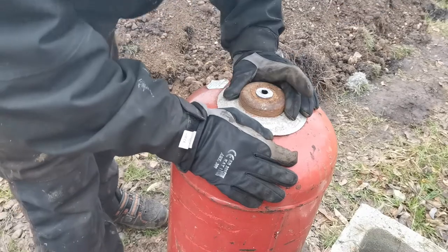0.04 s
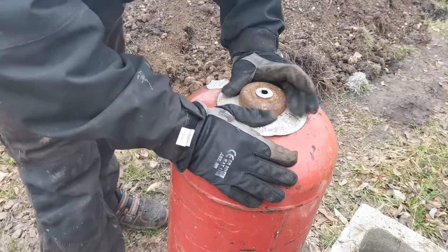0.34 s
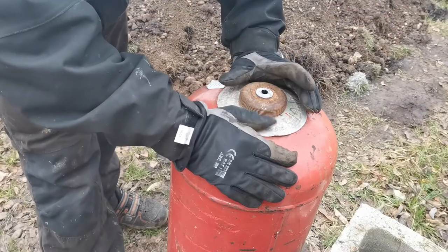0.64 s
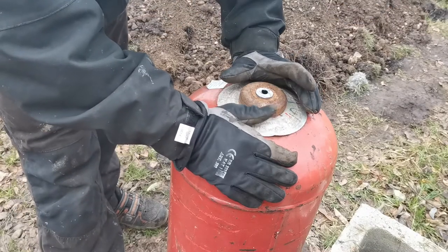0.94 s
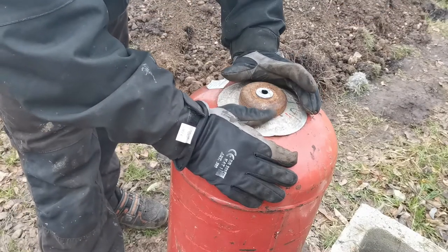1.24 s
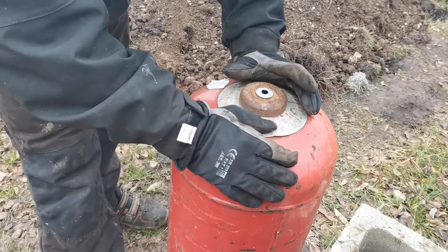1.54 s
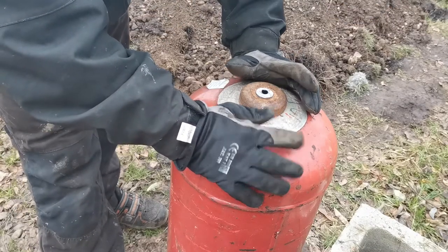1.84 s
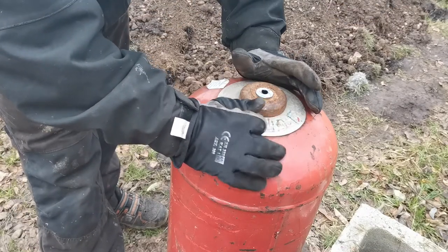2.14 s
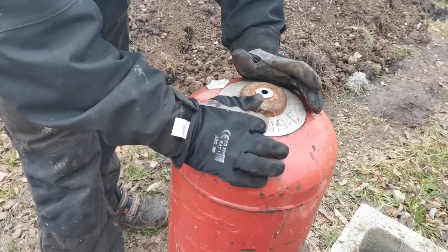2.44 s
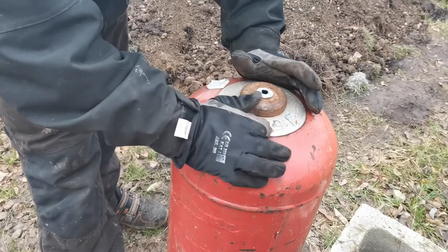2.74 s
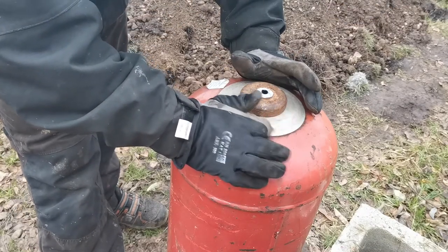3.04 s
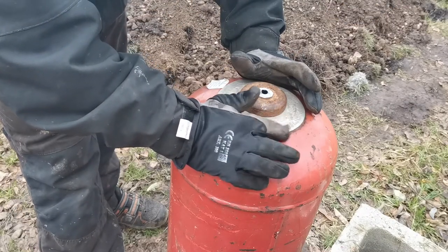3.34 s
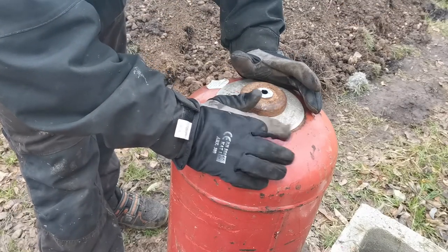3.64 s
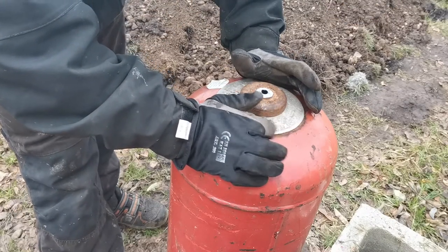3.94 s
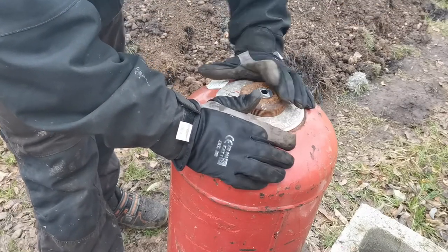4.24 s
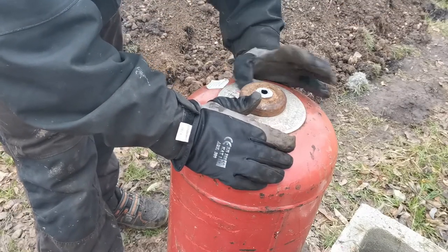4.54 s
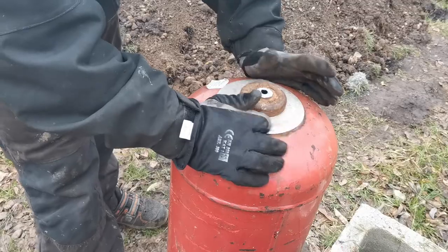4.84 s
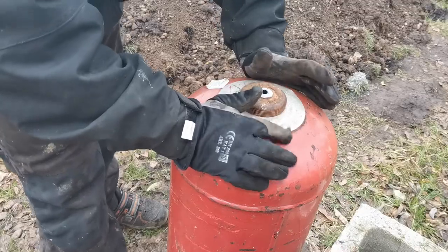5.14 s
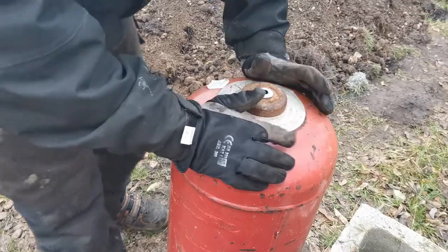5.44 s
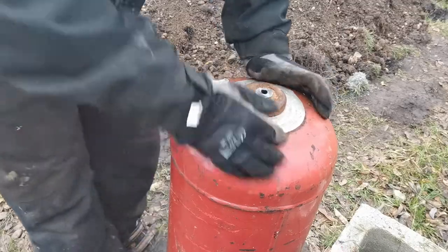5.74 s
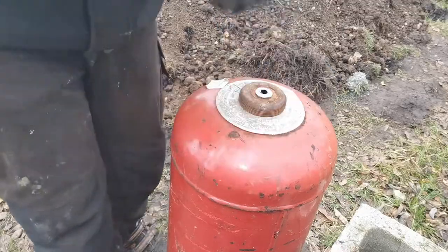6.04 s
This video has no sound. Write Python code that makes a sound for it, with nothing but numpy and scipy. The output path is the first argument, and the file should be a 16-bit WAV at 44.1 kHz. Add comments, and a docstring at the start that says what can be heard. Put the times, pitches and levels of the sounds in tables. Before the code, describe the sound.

Close by, a loose rusty collar is rocked on a steel gas cylinder in quick, gritty clicks that grow louder. Longer scrapes follow, with small squeaks and a faint metal ring. Gloves rub, the collar snaps free sharply and scrapes again, then clothes rustle as someone steps back. A soft, distant outdoor rush lies underneath.

```python
"""Stick-slip friction on a rusty gas cylinder

Outdoors, gloved hands rock a loose metal collar around the valve of a steel cylinder, then drag it round
in longer scrapes. Rust grates in tiny slips that excite the hand-damped collar and, faintly, the shell;
now and then the collar catches and snaps free. At the end the worker steps back with
rustling clothes. Behind it all lies a soft distant rush in which something moans once."""
import sys
import numpy as np
from scipy import signal
from scipy.fft import rfft, irfft, next_fast_len
from scipy.io import wavfile
from scipy.ndimage import map_coordinates

SR = 44100
rng = np.random.default_rng(int(sys.argv[2]) if len(sys.argv) > 2 else 0)


def pcm_store(signal):
    """Save signal as 16-bit PCM."""
    levels = np.round(np.clip(np.atleast_2d(signal), -1, 1) * 32767)
    wavfile.write(sys.argv[1], SR, levels.astype(np.int16).T)


N = 277642

# spectrum of the distant rush: (frequency [Hz], gain [dB])
AIR_SPECTRUM = [(13, -35), (22, -5.5), (49, -2), (192, -11.5), (227, -3.5), (342, -8), (371, -8.5),
                (650, -5), (860, 0), (1240, -6), (1680, -12), (2150, -19.5), (4040, -31), (6440, -43),
                (9200, -49), (15500, -46.5)]
# left-right likeness of the rush: (frequency [Hz], coherence [ratio])
AIR_COHERENCE = [(30, 0.56), (100, 0.81), (400, 0.83), (900, 0.22), (2500, 0.043), (9000, 0.38)]
# thin tones above the moan: (starting frequency [Hz], level relative to the moan [dB])
MOAN_PARTIALS = [(2190, -17), (3720, -29)]
# steps and flaps of clothing: (time [s], relative level [dB], frequency [Hz], bandwidth [Hz], t60 [s])
BUMPS = [(5.642, -36.5, 376, 480, 0.11), (5.655, -46, 1800, 2000, .06), (5.875, -36.5, 447, 600, 0.035),
         (6.042, -36.5, 1100, 1650, 0.077), (6.116, -30.5, 313, 259, 0.051)]
# sleeves and trousers rubbing: (peak time [s], half length [s], level [dB])
BODY_MOVES = [(.35, 0.23, -62), (4.68, 0.29, -60.5), (5.412, 0.23, -55.5), (5.963, 0.28, -50.5)]
# spectrum of rustling cloth: (frequency [Hz], gain [dB])
FABRIC_SPECTRUM = [(500, 6), (1500, -1.5), (3000, 0), (4500, 2), (5800, -3), (7200, -2.5), (10000, -5),
                   (13000, -12.5), (16000, -34)]
# gloves sliding over paint and rust: (start [s], rise [s], fall [s], level [dB])
GLOVE_RUBS = [(1.870, 0.062, 0.1, -45.5), (4.110, .110, 0.099, -39.5), (4.340, 0.096, 0.04, -43),
              (4.525, 0.018, 0.091, -44)]
# spectrum of glove friction: (frequency [Hz], gain [dB])
GLOVE_SPECTRUM = [(400, -14), (1300, 2), (1900, -2.5), (2700, 1.5), (4500, -2), (5700, -6), (7200, -5.5),
                  (10000, -11.5), (13000, -22.5), (16000, -36)]
# echo spectrum, short wavelengths scattering most: (frequency [Hz], gain [dB])
ECHO_SPECTRUM = [(1000, -6.5), (2400, -6.5), (4500, -4), (9000, -2.5)]
# decay of the shell's dense weak modes: (frequency [Hz], t60 [s])
HAZE_DECAY = [(500, .08), (1300, 0.23), (2400, 0.23), (3000, 0.21), (4600, 0.41), (5600, 0.26),
              (9000, 0.17), (15000, .06)]
# the collar is turned back and swells into its stop: (stop time [s], relative level [dB])
RETURN_TURNS = [(.506, -35.5), (.697, -41), (.878, -30.5), (1.054, -29), (1.229, -21.5), (1.387, -25),
                (1.574, -18.5)]
# the collar is pushed on, breaks free and grates to rest:
# (time [s], relative level [dB], fall [s], low emphasis [dB], sharpness [dB])
BREAKAWAYS = [(.567, -28.5, 0.026, 4, -18.5), (.756, -26.5, 0.038, 7, -17), (.930, -21.5, .038, 3.5, -15),
              (1.094, -22, 0.04, 2, -17), (1.273, -20, 0.023, -2.5, -16.5), (1.440, -20.5, 0.012, 2, -19.5),
              (1.939, -31, 0.0055, 5, -22), (2.338, -33, 0.011, 13.5, -2), (2.411, -44.5, 0.026, 16, 6),
              (2.983, -40, .03, 9, -6), (4.444, -11.5, 0.0057, -7, -2), (5.247, -22.5, 0.025, 3.5, -4)]
# flakes of rust breaking off: (time [s], relative level [dB], sharpness [dB])
FLAKES = [(.58, -46, 12.5), (.770, -26, -8), (.870, -28.5, -16), (1.182, -56, 22), (1.898, -39, 0),
          (2.108, -27, 7), (2.656, -49, 8.5), (3.088, -19, 6.5), (3.1123, -17.5, 4), (3.128, -26.5, 12.5),
          (3.371, -46.5, 2), (4.447, -17, 4), (4.546, -39.5, 15.5), (4.860, -18, -9), (4.996, -41, 11),
          (5.155, -46.5, 7.5)]
# light slides that swell and stop: (peak time [s], relative level [dB], fall [s], low emphasis [dB])
LIGHT_SLIDES = [(2.449, -32, 0.0091, -7), (2.773, -30.5, 0.027, 3.5), (2.836, -48, 0.014, 8.5),
                (3.826, -31, 0.01, -13)]
# long scrapes, one curve each: (time [s], relative level [dB], treble emphasis [dB], low emphasis [dB])
LONG_SCRAPES = [
    [(1.95, -45.5, -4, -12), (2.014, -42.5, -3.5, -3), (2.058, -32, -6, 3.5), (2.066, -37.5, -3, -0.5),
     (2.088, -19, -6, 0), (2.11, -24.5, -6.5, -10.5), (2.122, -29.5, -20, -5), (2.15, -53, -7, -1)],
    [(3.03, -45, -11, -3), (3.056, -48, -4.5, -2), (3.076, -26.5, -3, -6.5), (3.128, -28, -14, -20),
     (3.146, -33, -4.5, -23), (3.206, -31.5, -7, -14.5), (3.262, -36, -12.5, -13), (3.29, -58, -14, -12)],
    [(3.41, -62, -4, 3), (3.426, -23.5, -12, -6.5), (3.46, -21, -8.5, -10.5), (3.505, -41.5, -29, -2)],
    [(4.848, -42, -13, -16), (4.862, -18, -13.5, -14), (4.874, -23.5, -8.5, -6), (4.902, -23.5, -6, -9.5),
     (4.954, -29.5, -10.5, -4), (4.992, -36, -9, -14), (5.04, -56, -9, -3)],
]
# brief tones of the collar (squeaks in the scrapes, a scrape's low note, the loudest snap's short ring):
# (peak time [s], rise and fall each [s], frequency [Hz], level [dB])
COLLAR_TONES = [(2.089, .012, 926, -25.5), (2.091, .018, 1130, -24.5), (2.108, 0.018, 2370, -26.5),
                (3.082, .02, 1500, -33), (3.113, .04, 2234, -28), (3.175, 0.062, 1776, -37),
                (3.198, .045, 1305, -35), (3.45, .025, 1470, -32.5), (4.446, .004, 1450, -27),
                (4.446, 0.0037, 2500, -21), (4.446, .004, 5750, -21), (4.948, 0.026, 1600, -34),
                (4.952, 0.052, 2080, -31.5), (4.962, 0.036, 2630, -38)]
# force spectrum of a slip on rust: (frequency [Hz], gain [dB])
SLIP_SPECTRUM = [(60, -13), (300, -22), (700, 8.5), (1200, -1.5), (10500, -0.5), (13000, 4), (16000, -36)]
# modes of the collar damped by the gloves: (frequency [Hz], bandwidth [Hz], relative gain [dB])
DAMPED_COLLAR_MODES = [(1139, 337, -8.5), (1423, 232, -1.5), (2253, 219, 1.5), (2558, 276, 1.5),
                       (3257, 146, -10), (3914, 446, -6), (4850, 560, -8.5), (5614, 427, -10),
                       (6930, 720, -13.5), (9690, 1500, -21.5)]
# modes of the collar where the gloves lift off it: (frequency [Hz], relative energy [dB], t60 [s])
FREE_COLLAR_MODES = [(2222, -14, 0.11), (2520, -24, 0.12), (2614, -11.5, 0.05), (3280, -19, 0.12),
                     (3980, -14.5, 0.11), (5600, -26, 0.047), (7220, -25, 0.033)]
# modes of the cylinder's shell: (frequency [Hz], relative energy [dB], t60 [s])
SHELL_MODES = [(1309, -14, 0.37), (1560, -24, 0.23), (1740, -30, 0.59), (1788, -19, 0.14), (3210, -30, 0.4),
               (3610, -32, .3), (3990, -33, 0.15), (3990, -31, 0.29), (4280, -42, .33), (4440, -38, .33),
               (4750, -31, 0.33), (4800, -33.5, 0.27), (4970, -35, 0.33), (6650, -45, .2)]
# stereo level difference of the valve's sound: (frequency [Hz], left minus right [dB])
LEVEL_DIFFERENCE = [(800, 0), (1150, -2), (1500, 0), (1900, -3), (2600, -4), (3900, -2.5), (4600, -3.5),
                    (7200, -2.5), (7900, -4), (9400, 16.5), (10500, -9), (15000, 5)]
# stereo phase difference of the valve's sound: (frequency [Hz], left lead [rad])
PHASE_DIFFERENCE = [(1400, 0), (4500, 0.7), (7000, 0.77), (9500, 2.4), (11000, -2), (13000, -2.5)]


def amp(db):
    """Amplitude grows tenfold for every 20 dB."""
    return 10 ** (np.asarray(db) / 20)


def unit(x):
    """Normalisation to an rms of 1."""
    return x / np.sqrt(np.mean(x ** 2) + 1e-20)


def along(points, hz):
    """Interpolation of (frequency, value) points on a logarithmic frequency axis."""
    frequencies, values = np.transpose(points)
    return np.interp(np.log(hz + 1), np.log(frequencies), values)


def wobble(rate, size):
    """Random modulation: a smooth curve with `rate` knots a second."""
    knots = rng.standard_normal(int(size * rate / SR) + 4)
    return map_coordinates(knots, [np.arange(size) * rate / SR])


def filtered(x, response):
    """Linear filtering: the spectrum of x is multiplied by a complex frequency response."""
    size = x.shape[-1]
    padded = next_fast_len(size + 1024, real=True)
    return irfft(rfft(x, padded) * response(np.fft.rfftfreq(padded, 1 / SR)), padded)[..., :size]


def below(x, hz, order=8):
    """Zero-phase low-pass filtering keeps the part of x under a frequency."""
    return filtered(x, lambda f: 1 / (1 + (f / hz) ** order))


def resonance(f, hz, width):
    """Forced response of one damped mode, with gain 1 at its centre."""
    return 1j * f * width / (hz * hz - f * f + 1j * f * width)


def add(track, start, x):
    """Superposition: x joins the track at a start time in seconds."""
    part = track[..., max(round(start * SR), 0):][..., :x.shape[-1]]
    part += x[..., :part.shape[-1]]


def swell(t, rise, fall, swell_db, sag_db, release):
    """Exponential growth and decay: an envelope that builds, sags and dies away."""
    return amp(np.interp(t, np.cumsum([0, rise, fall, release]), [-swell_db, 0, -sag_db, -80]))


def stereo_noise(spectrum, coherence):
    """Partial coherence: independent mid and side noises mix to a given left-right likeness."""
    def response(hz):
        angle = np.arccos(np.clip(along(coherence, hz), -1, 1)) / 2
        return amp(along(spectrum, hz)) * [np.cos(angle), np.sin(angle)]
    mid, side = filtered(rng.standard_normal((2, N)), response)
    return unit(np.array([mid + side, mid - side]))


def distant_rush(level_db=-47.5):
    """Ambient noise: a nearly steady rush, weighted to low frequencies."""
    return amp(level_db + 0.14 * wobble(5.09, N)) * stereo_noise(AIR_SPECTRUM, AIR_COHERENCE)


def distant_moan(start=2.23, level_db=-45, centre_hz=584, width_hz=250, sag_per_s=0.1):
    """Narrow-band noise swells and fades as a hollow, far-off moan; two thin tones sink above it."""
    track, t = np.zeros((2, N)), np.arange(SR) / SR
    noise = rng.standard_normal(len(t)) + 0.5 * rng.standard_normal((2, len(t)))
    moan = unit(filtered(noise, lambda f: resonance(f, centre_hz, width_hz) ** 2))
    for hz, db in MOAN_PARTIALS:
        pitch = hz * (1 - sag_per_s * t + 0.025 * wobble(300, len(t)))
        tone = np.sin(2 * np.pi * np.cumsum(pitch) / SR)
        moan += amp(db) * unit(tone * amp(3.2 * wobble(49, len(t))))
    envelope = swell(t, rise=0.43, fall=0.053, swell_db=6, sag_db=5, release=0.82)
    add(track, start, amp(level_db) * envelope * moan)
    return track


def worker(still_db=-69.5):
    """Cloth friction rustles with each move; boots and flaps of cloth give heavily damped impacts."""
    bumps, t = np.zeros((2, N)), np.arange(SR // 8) / SR
    attack = 1 - np.exp(-t / 0.00062)
    for start, db, hz, width, t60 in BUMPS:
        colour = lambda f: resonance(f, hz, width) ** 2 + 0.23 * resonance(f, hz, width)
        puff = unit(filtered(rng.standard_normal(len(t)), colour))
        add(bumps, start, amp(db + 0.5 - 60 * t / t60) * attack * puff)
    clock = np.arange(N) / SR
    motion = sum(amp(db) * np.exp(-((clock - peak) / half) ** 2) for peak, half, db in BODY_MOVES)
    flutter = amp(1.3 * wobble(18, N))
    rustle = stereo_noise(FABRIC_SPECTRUM, coherence=[(1000, 0.2), (8000, 0.045)])
    return bumps + (amp(still_db) + motion) * flutter * rustle


def gloves():
    """Sliding friction of rubber-coated fabric gives short, grainy hisses."""
    envelope, t = np.zeros(N), np.arange(SR // 2) / SR
    for start, rise, fall, db in GLOVE_RUBS:
        add(envelope, start, amp(db) * swell(t, rise, fall, swell_db=32.5, sag_db=13.5, release=0.09))
    grain = amp(1.5 * wobble(600, N))
    return envelope * grain * stereo_noise(GLOVE_SPECTRUM, coherence=[(1500, 0.87), (9000, 0.16)])


def scatter(x, t60):
    """Scattering from arms, cylinder and ground adds brief echoes, different left and right."""
    t = np.arange(SR // 16) / SR
    echoes = rng.standard_normal((2, len(t))) * amp(-60 * t / t60) * (t > 0.0005)
    echoes = filtered(echoes / np.linalg.norm(echoes[0]), lambda hz: amp(along(ECHO_SPECTRUM, hz)))
    return x + signal.fftconvolve(x[None], echoes, axes=1)[:, :len(x)]


def shell_haze(x, wet_db):
    """Modal overlap: the shell's many weak modes merge into a noisy tail behind each contact."""
    hz, t, spectra = signal.stft(rng.standard_normal((2, SR // 5)), SR, nperseg=256)
    decay = amp(-60 * t / along(HAZE_DECAY, hz)[:, None])
    _, tail = signal.istft(spectra * decay, SR, nperseg=256)
    response = amp(wet_db) * tail / np.linalg.norm(tail[0])
    response[:, 0] += 1  # the contact itself
    return signal.fftconvolve(x, response, axes=1)


def ring(modes):
    """Free vibration: after an impulse, a steel part rings as a sum of decaying sinusoids."""
    t = np.arange(SR // 2) / SR
    waves = [(db, np.cos(2 * np.pi * hz * t) * amp(-60 * t / t60)) for hz, db, t60 in modes]
    return sum(amp(db) * wave / np.linalg.norm(wave) for db, wave in waves)


def contact(force, low_db, sharp_db):
    """Contact stiffness: a broad, soft contact favours the low resonance, a hard edge the treble."""
    # (frequency [Hz], gain [dB])
    tilt = [(500, low_db * 0.94), (1050, low_db * 1.21), (1500, low_db * 0.79), (2000, 0.013),
            (2800, 0.0092), (4300, sharp_db * 0.45), (7000, sharp_db), (12000, sharp_db * 1.42)]
    return filtered(force, lambda hz: amp(along(tilt, hz)))


def grit(size, slips_per_s=1500, spread_db=3.5, dust=0.39, judder_db=1.42, judder_rate=301.7):
    """Stick-slip force on rust: random slips of uneven size over fine dust, as the collar judders."""
    slipping = rng.random(size) < slips_per_s / SR
    strengths = amp(spread_db * np.clip(rng.standard_normal(size), -2, 2))
    slips = unit(slipping * strengths * rng.choice([-1, 1], size))
    spray = slips + dust * rng.standard_normal(size)
    return unit(spray * amp(judder_db * wobble(judder_rate, size)))


def grating(rise, fall, db, low_db, sharp_db):
    """Friction noise takes its energy from the push, which swells, sags and stops."""
    t = np.arange(SR // 4) / SR
    push = swell(t, rise, fall, swell_db=35, sag_db=12, release=0.058)
    slips = push * grit(len(t))
    stroke = amp(db) * np.linalg.norm(push) * slips / np.linalg.norm(slips)
    return shell_haze(scatter(contact(stroke, low_db, sharp_db), t60=0.018), wet_db=-23)


def snapping(db, sharp_db, crumble=0.24, t60=0.025, gain_db=18, low_db=-4):
    """Impulsive excitation: one sharp kick with a moment of crumbling rust."""
    t = np.arange(SR // 25) / SR
    kick = crumble * rng.standard_normal(len(t)) * amp(-60 * t / t60)
    kick[SR // 2000] += 1
    snap = contact(amp(db + gain_db) * kick / np.linalg.norm(kick), low_db, sharp_db)
    return shell_haze(scatter(snap, t60=0.013), wet_db=-15.5)


def rocking(turn_rise=0.018, turn_fall=0.0074, catch_rise=0.002014, firm_db=-17.5, dulling=0.67):
    """Static friction yields: turned back, the collar grates and knocks; pushed on, snaps and grates."""
    force = np.zeros((2, N))
    for stop, db in RETURN_TURNS:
        start = stop - turn_rise
        low_db = dulling * (firm_db - db)  # a lighter push sounds duller
        add(force, start, snapping(db=-46.5, sharp_db=7.5))  # rust cracks as the turn starts
        add(force, start, grating(turn_rise, turn_fall, db, low_db, sharp_db=-16.5))
        add(force, stop, snapping(db - 4, sharp_db=-4))  # the knock at the stop
    for start, db, fall, low_db, sharp_db in BREAKAWAYS:
        add(force, start, snapping(db + 1, sharp_db + 6))
        add(force, start - catch_rise / 2, grating(catch_rise, fall, db, low_db, sharp_db))
    for start, db, sharp_db in FLAKES:
        add(force, start, snapping(db, sharp_db))
    return force


def scraping(low_hz=1660, treble_hz=3630, slide_rise=0.056, release=0.024):
    """Sliding friction changes colour as the dragged collar's contact moves between face and edge."""
    force = np.zeros((2, N))
    for peak, db, fall, low_db in LIGHT_SLIDES:
        add(force, peak - slide_rise, grating(slide_rise, fall, db, low_db, sharp_db=3.5))
    for curve in LONG_SCRAPES:
        times, *columns = np.transpose(curve)
        t = np.arange(times[0], times[-1], 1 / SR)
        level_db, edge_db, face_db = [np.interp(t, times, column) for column in columns]
        slips = grit(SR // 2, slips_per_s=1000, spread_db=4, judder_db=1.64, judder_rate=280)[:len(t)]
        low, treble = below(slips, low_hz), slips - below(slips, treble_hz)
        middle = slips - low - treble
        drag = amp(8 + face_db) * low + amp(-1.5) * middle + amp(7.5 + edge_db) * treble
        taper = np.clip((times[-1] - t) / release, 0, 1)  # the hand comes to rest
        add(force, times[0], shell_haze(scatter(amp(level_db) * taper * drag, t60=0.02), wet_db=-22.5))
    return force


def collar_tones(waver=0.012, waver_rate=270, rough_db=1.5):
    """Frequency and amplitude modulation: the collar's brief tones waver in pitch and strength."""
    track, t = np.zeros(N), np.arange(SR // 4) / SR
    for peak, rise, hz, db in COLLAR_TONES:
        pitch = hz * (1 + waver * wobble(waver_rate, len(t)))
        phase = 2 * np.pi * np.cumsum(pitch) / SR
        tone = unit(np.sin(phase) * amp(rough_db * wobble(177, len(t))))
        envelope = swell(t, rise, fall=rise, swell_db=12.5, sag_db=7, release=0.041)
        add(track, peak - rise, amp(db) * envelope * tone)
    return track


def damped_collar(force, gain_db=13.5):
    """Damping by the gloves broadens the collar's modes, which filter the force of the slips."""
    def response(f):
        modes = sum((-1) ** k * amp(db) * resonance(f, hz, width)
                    for k, (hz, width, db) in enumerate(DAMPED_COLLAR_MODES))
        return amp(along(SLIP_SPECTRUM, f)) * modes
    return amp(gain_db) * filtered(force, response)


def valve_direction(hz):
    """Differences of level and phase between left and right place the valve in space."""
    sides = np.array([[0.5], [-0.5]])
    gain = amp(sides * along(LEVEL_DIFFERENCE, hz))
    return gain * np.exp(1j * sides * along(PHASE_DIFFERENCE, hz))


def valve(ping_time=3.827, ping_hz=3930, ping_db=-9, ping_t60=0.12):
    """Forced vibration: slips and snaps drive the collar and the shell under it."""
    turns, scrapes = rocking(), scraping()
    metal = damped_collar(turns + scrapes)
    # the gloves grip harder for a turn than for a scrape, leaving less free ring
    for modes, turn_db, scrape_db in ((SHELL_MODES, -3, -2), (FREE_COLLAR_MODES, -7.5, -5.5)):
        drive = amp(turn_db) * turns + amp(scrape_db) * scrapes
        metal += signal.fftconvolve(drive, ring(modes)[None], axes=1)[:, :N]
    metal += collar_tones()
    add(metal, 0, amp(-4.5) * ring(SHELL_MODES))  # the shell still rings from earlier handling
    add(metal, ping_time, ring([(ping_hz, ping_db, ping_t60)]))  # a glove flicks the collar's rim
    return filtered(metal, valve_direction)


def scene():
    """Superposition of the valve and hands up close, the worker, and the open air behind."""
    return valve() + gloves() + worker() + distant_rush() + distant_moan()


def record(dry, top_hz=15850):
    """Hard limiting at full scale, followed by a sharp band limit."""
    return filtered(np.clip(dry, -1, 1), lambda hz: hz < top_hz)


dry = scene()
out = record(dry)
pcm_store(out)
```